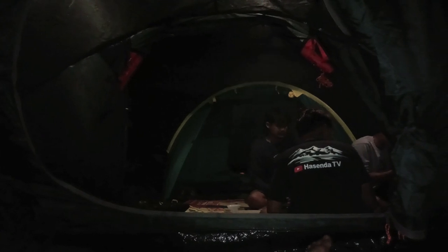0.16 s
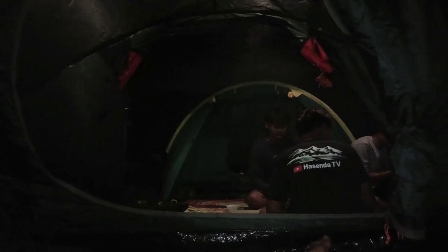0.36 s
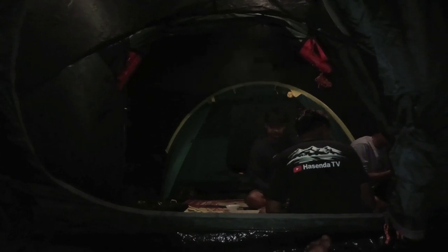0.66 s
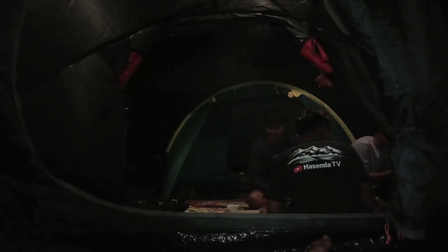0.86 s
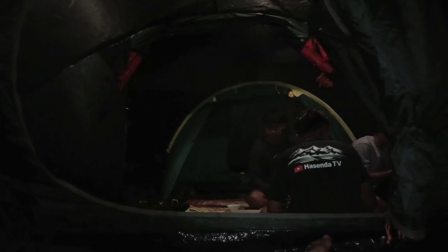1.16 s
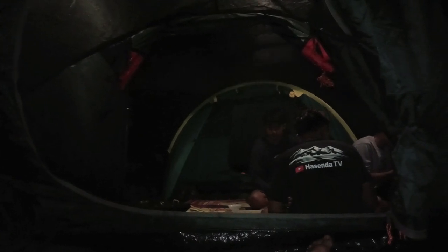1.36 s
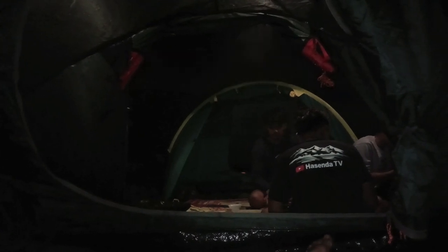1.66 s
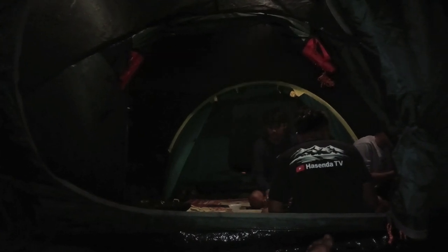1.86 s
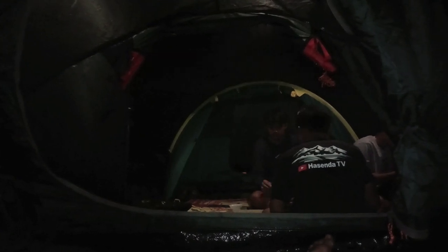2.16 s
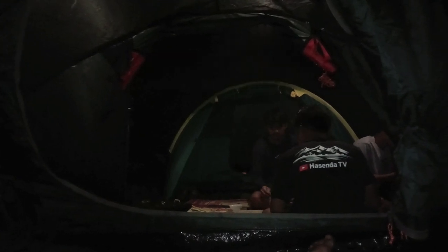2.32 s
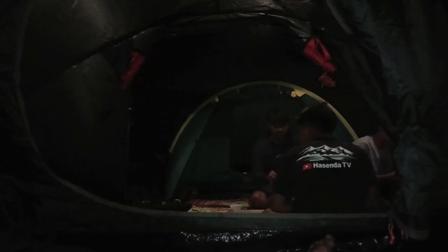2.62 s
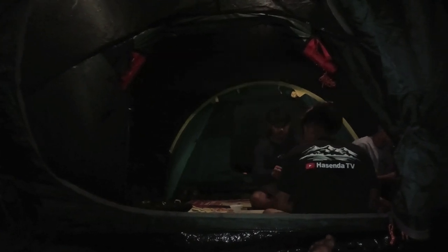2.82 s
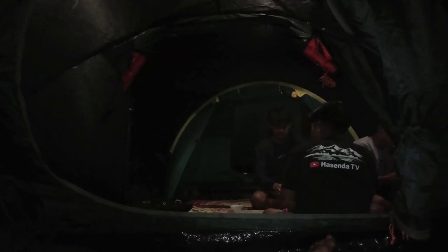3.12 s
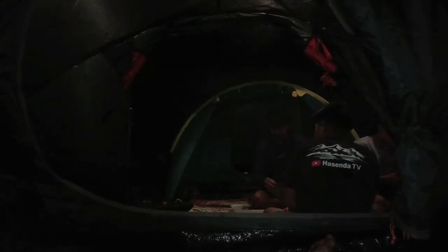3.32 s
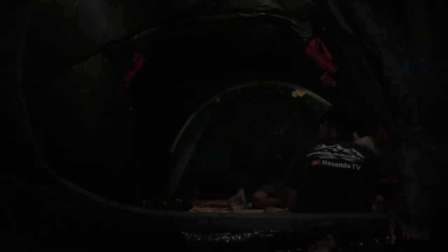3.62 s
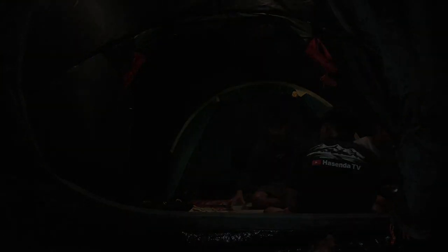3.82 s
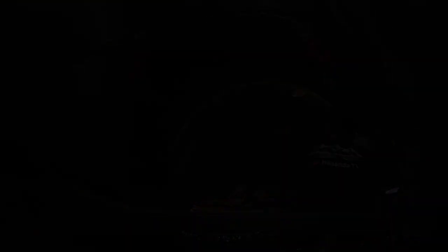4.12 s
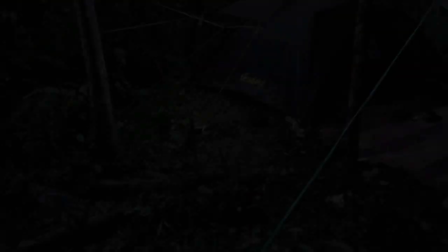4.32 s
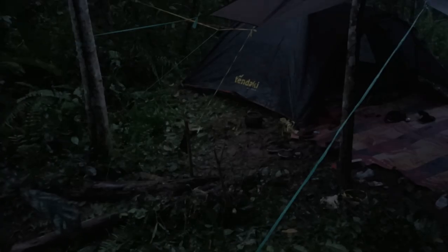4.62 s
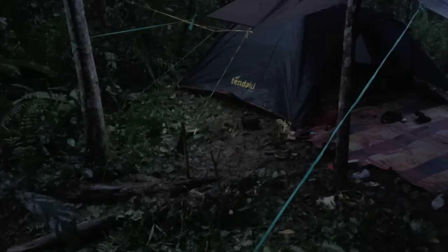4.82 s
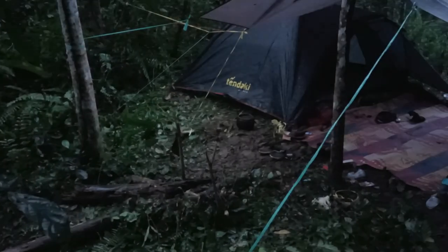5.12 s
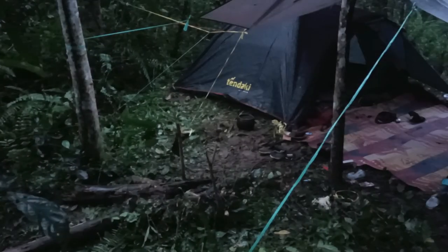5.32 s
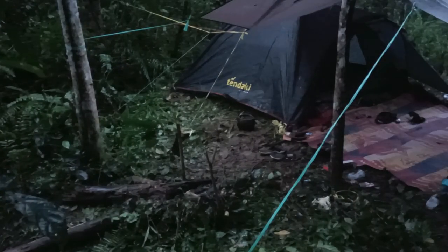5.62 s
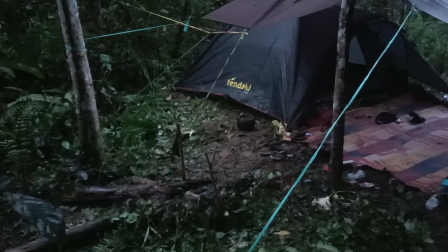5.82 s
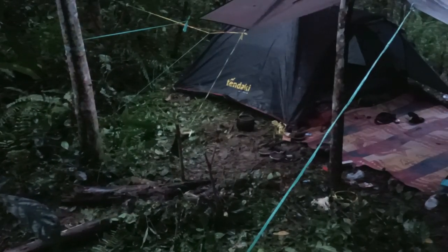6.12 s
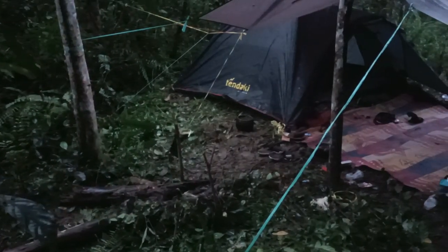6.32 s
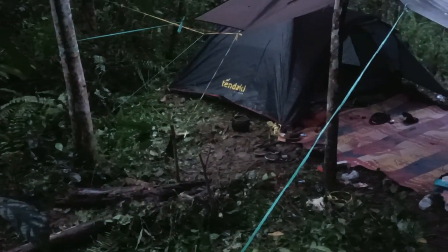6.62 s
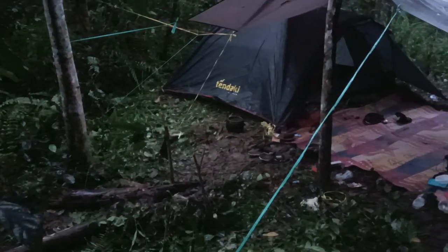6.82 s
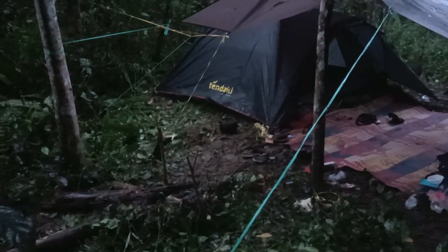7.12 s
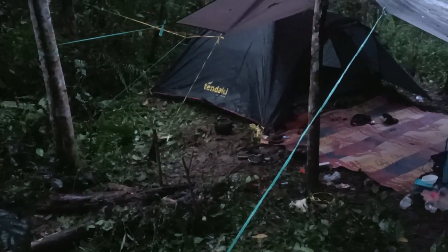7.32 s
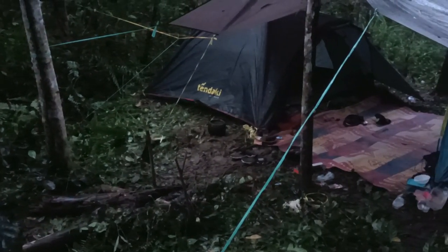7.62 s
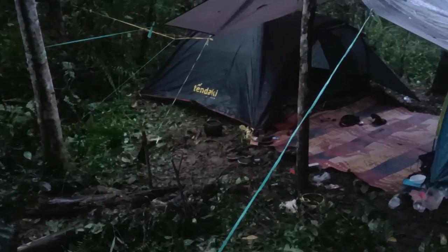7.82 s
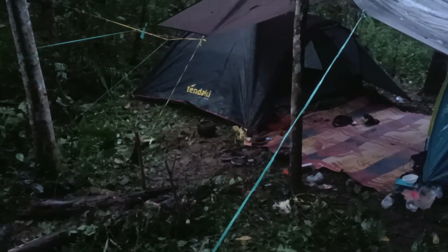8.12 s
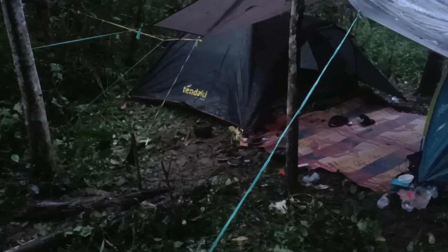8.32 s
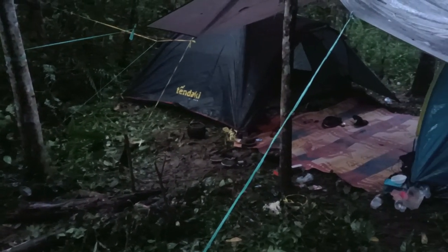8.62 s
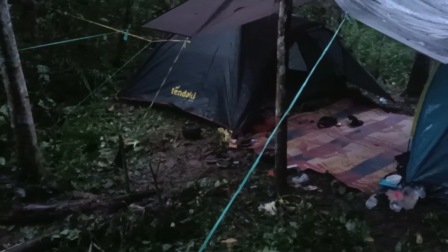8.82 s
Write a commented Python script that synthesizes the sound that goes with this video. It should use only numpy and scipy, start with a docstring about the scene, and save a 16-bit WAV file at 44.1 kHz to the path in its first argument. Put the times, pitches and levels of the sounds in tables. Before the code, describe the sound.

Heavy rain thumps and patters on a tarp overhead, fades out, then quiet forest dawn with rising bird whistles, chirps, insects and drips.

```python
"""Downpour on a tarp, then a forest at dawn

Fat drops thump the tarp just overhead: a push and scattered modes, a wet slap and noise spray, over a wash on leaves.
The rain fades away to a murmuring forest of shaped noise, where the last drips fall from the trees.
Birds whistle, sing and chirp as gliding tones among echoing trees; insects pip as tones and rasp as noise.
A cicada drones as a train of ringing clicks. The right microphone is the brighter one."""
import sys
import numpy as np
from scipy import signal
from scipy.fft import rfft, irfft, next_fast_len
from scipy.io import wavfile
from scipy.ndimage import map_coordinates

SR = 44100
rng = np.random.default_rng(int(sys.argv[2]) if len(sys.argv) > 2 else 0)


def generate_wav(sig):
    """Save sig (samples, or channels by samples) to the path in sys.argv[1] as 16-bit PCM at SR."""
    pcm = np.round(np.clip(np.atleast_2d(sig).T, -1, 1) * 32767).astype(np.int16)
    wavfile.write(sys.argv[1], SR, pcm)


N = 395136
CLOCK_S = np.arange(N) / SR
RAIN_ENDS_S, DAWN_S = 4.21, 4.275

# the forest's murmur through the morning, before each layer's trim: start_s, murmur_db
MORNING = [(4.32, -68.5), (4.51, -63), (4.89, -60), (5.67, -67.5), (8.66, -68), (8.9, -67.5)]


def amp(db):
    """Decibels to gain."""
    return 10 ** (np.asarray(db) / 20)


def unit(x):
    """Scale a sound to rms 1."""
    return x / np.sqrt(np.mean(x ** 2) + 1e-20)


def along(points, hz):
    """Read a curve of (Hz, value) points on a log frequency axis."""
    point_hz, values = np.transpose(points)
    return np.interp(np.log(hz + 1), np.log(point_hz + 1), values)


def curves(rows):
    """One value per sample for each column after the time."""
    s, *columns = np.transpose(rows)
    return [np.interp(CLOCK_S, s, column) for column in columns]


def wobble(rate, size=N):
    """A smooth random curve with this many knots a second."""
    knots = rng.standard_normal(int(size * rate / SR) + 4)
    return map_coordinates(knots, [np.arange(size) * rate / SR])


def filtered(x, response):
    """Multiply the spectrum of a sound by a response of frequency."""
    size = next_fast_len(N + SR // 2)
    spectrum = rfft(x, size) * response(np.fft.rfftfreq(size, 1 / SR))
    return irfft(spectrum, size)[..., :N]


def coloured(x, spectrum, size=2048):
    """Causal (minimum-phase) filter that keeps the power of white noise."""
    gain = amp(along(spectrum, np.fft.rfftfreq(size, 1 / SR)))
    cepstrum = irfft(np.log(gain))
    fold = np.r_[1, np.full(size // 2 - 1, 2), np.zeros(size // 2)]
    kernel = irfft(np.exp(rfft(cepstrum * fold)))
    return signal.fftconvolve(x, kernel[None] / np.linalg.norm(kernel), axes=1)[:, :N]


def add(track, s, sound):
    """Mix a sound into a track at time s."""
    part = track[..., max(round(s * SR), 0):][..., :sound.shape[-1]]
    part += sound[..., :part.shape[-1]]


def rush(spectrum, grain_db):
    """Stereo noise of rms 1, near mono in the bass, with a fine flutter of level."""
    # likeness of left and right: pitch_hz, correlation
    likeness = [(60, 0.89), (280, 0.76), (640, 0.07), (1400, -0.23), (3000, -0.058)]

    def mid_side(hz):
        turn = np.arccos(np.clip(along(likeness, hz), -1, 1)) / 2
        return amp(along(spectrum, hz)) * [np.cos(turn), np.sin(turn)]
    pair = rng.standard_normal((2, N)) * amp(grain_db * wobble(300))
    mid, side = filtered(pair, mid_side)
    return unit(np.array([mid + side, mid - side]))


def trees(x, direct_db, early_t60, late_t60, late_db, trunks_db=4.5):
    """Near trunks scatter a sound in uneven bunches, the deeper forest adds a second decay; t60 in s."""
    t = np.arange(SR) / SR
    decay = amp(-60 * t / early_t60) + amp(late_db - 60 * t / late_t60)
    decay = decay * (1 - np.exp(-t / 0.0033))
    echo = rng.standard_normal((2, SR)) * decay * amp(trunks_db * wobble(111.3, SR))
    echo = echo / np.linalg.norm(echo, axis=1, keepdims=True)
    wet = signal.fftconvolve(x[None], echo, axes=1)[:, :N]
    return (amp(direct_db) * x + wet) / np.hypot(1, amp(direct_db))


def forest():
    """Noise murmurs over a low rumble; far insects are a narrow random band that comes and goes."""
    # spectrum of the murmur: pitch_hz, level_db per Hz
    air = [(25, -14), (130, -7), (250, -8), (420, -4), (950, -9.5), (1500, -7.5), (2300, -6.5), (4200, -14),
           (6200, -10.5), (7000, -12), (8200, -27), (9600, -13.5), (11500, -33), (13000, -21.5),
           (15500, -25)]
    # spectrum of the rumble under it: pitch_hz, level_db per Hz
    low_rumble = [(15, -14), (30, -11.5), (80, -1), (150, -1), (230, -10.5), (500, -27.5)]
    murmur_db, = curves(MORNING)
    murmur = amp(murmur_db + 9) * rush(air, grain_db=1.6)
    rumble = amp(-63.5) * rush(low_rumble, grain_db=1.0)
    drift = wobble(110) + 1j * wobble(110)
    far_pips = np.real(drift * np.exp(2j * np.pi * 5030 * CLOCK_S))
    far_pips = far_pips * amp(-73.5 + 1.9 * wobble(11))
    return murmur + rumble + far_pips


def cicada(ring_s=0.0013, weak_click=0.57, jitter=0.00126, flutter_db=1.0):
    """The tymbal buckles in and out, a strong and a weak click; each rings the body, and the trees blur them."""
    # the drone: start_s, body_hz, level_db
    drone = [(4.3, 6830, -59.5), (5.3, 6900, -61), (6.3, 6850, -66.5), (7.3, 6850, -67.5),
             (8.1, 6540, -63.5), (8.96, 6230, -61.5)]
    clicks_hz, tires_at_s, slows_hz_per_s = 258.5, 7.3, 2.4
    body_hz, db = curves(drone)
    rate = clicks_hz - slows_hz_per_s * np.maximum(CLOCK_S - tires_at_s, 0)
    unsteady = jitter * (1 + np.abs(rate - rate.max()))  # the beat loosens as the song winds down
    clicks = np.cumsum(rate * (1 + unsteady * wobble(60))) / SR
    age = clicks % 1 / rate  # seconds since the last click
    size = np.where(np.floor(clicks) % 2, weak_click, 1) * amp(flutter_db * wobble(25))
    envelope = np.exp(-age / ring_s) * (1 - np.exp(-age / 0.00051))
    ring = size * envelope * np.sin(2 * np.pi * body_hz * age)
    return trees(amp(db) * unit(ring), direct_db=0.5, early_t60=0.32, late_t60=1.0, late_db=-11.5)


def tone(s, pitch, db, attack=0.0061, release=0.0058, waver=0.0046, flutter_db=1.5, overtone_db=-26):
    """A track with one nearly pure note along a pitch curve; its overtones flash near 10 kHz."""
    size, track = len(pitch), np.zeros(N)
    t = np.arange(size) / SR
    phase = 2 * np.pi * np.cumsum(pitch * (1 + waver * wobble(118, size))) / SR
    gate = np.clip(np.minimum(t / attack, (t[-1] - t) / release), 0, 1)
    gate = gate * amp(flutter_db * wobble(29.5, size))
    overtones = sum(np.sin(k * phase) * np.exp(-((k * pitch - 9850) / 750) ** 2) for k in (3, 4))
    richness = amp(overtone_db + np.minimum(db + 36, 0))  # softer notes are purer
    add(track, s, np.sqrt(2) * amp(db) * gate * (np.sin(phase) + richness * overtones))
    return track


def progress(length):
    """From 0 to 1 over a note's length in seconds."""
    return np.linspace(0, 1, int(length * SR))


def pip(s, length, hz, db, rise=.16, fall=0.32):
    """A thin, fluttering note that swells and fades over shares of its length."""
    pitch = np.full(int(length * SR), hz)
    return tone(s, pitch, db, attack=rise * length, release=fall * length,
                waver=0.0034, flutter_db=1.0, overtone_db=-60)


def insects():
    """Thin tonal pips, and katydid rasps made of very high noise strokes, both echoed by the trees."""
    # pips: start_s, length_s, pitch_hz, level_db before the trees
    pip_rows = [(4.276, .09, 5330, -64), (4.70, 0.16, 5020, -53), (5.154, 0.071, 5000, -42.5),
                (5.605, 0.072, 4975, -45), (5.999, .12, 5300, -50), (6.126, .05, 5010, -50),
                (6.598, 0.057, 4980, -42.5), (6.78, 0.11, 5040, -59), (7.102, .1, 5285, -50),
                (7.579, .064, 5060, -58), (8.255, 0.028, 5060, -50), (8.59, 0.062, 4990, -42)]
    # rasps: start_s, length_s, level_db before the trees
    rasp_rows = [(4.267, .12, -61), (5.26, .073, -66.5), (5.64, .07, -59), (6.102, 0.064, -42),
                 (8.237, 0.072, -43.5), (8.708, .047, -61.5)]
    # spectrum of a rasp: pitch_hz, level_db per Hz
    rasp_spectrum = [(9000, -54.5), (12300, -28), (13500, -11), (14700, -12.5), (15200, 6.5), (15600, -9.5)]
    pips = sum(pip(*row) for row in pip_rows)
    rasps = np.zeros(N)
    for s, length, db in rasp_rows:
        stroke = signal.windows.tukey(int(length * SR), .6)
        add(rasps, s, amp(db) * stroke * rng.standard_normal(len(stroke)))
    rasps = coloured(rasps[None], rasp_spectrum)[0]
    pips = trees(pips, direct_db=-3.5, early_t60=0.27, late_t60=.8, late_db=-8)
    rasps = trees(rasps, direct_db=5.0, early_t60=.2, late_t60=.6, late_db=-10)
    return pips * amp([[-3], [-1.5]]) + rasps * amp([[-5], [0]])  # left, right


def whistle(s, length, first_hz, last_hz, db, scoop_hz=230, scoop_s=.075, swell_db=1.5):
    """The pitch scoops up into a long, even rise, and the note swells as it climbs."""
    u = progress(length)
    rise = last_hz + (first_hz + scoop_hz - last_hz) * (1 - u)
    pitch = rise - scoop_hz * np.exp(-u * length / scoop_s)
    return tone(s, pitch, db + swell_db * (u - .5), attack=0.019, release=0.011,
                waver=0.0078, flutter_db=1.0, overtone_db=-22.5)


def song(s, first_hz, top_hz, sweep_db, soft_db):
    """A soft note arches over, then an upsweep starts flat, steepens and levels off at its top."""
    soft_s, soft_hz, arch_hz = .2, 3010, 259.7
    sweep_s, sweep_curve = .26, 2.1
    arch = soft_hz + arch_hz * np.sin(2.56 * progress(soft_s))
    climb = np.minimum(progress(sweep_s) / .88, 1) ** sweep_curve
    sweep = first_hz + (top_hz - first_hz) * climb
    soft_note = tone(s - soft_s - .02, arch, soft_db, attack=0.039, release=0.068)
    return soft_note + tone(s, sweep, sweep_db, attack=.03, release=0.056, overtone_db=-34)


def chirp(s, length, first_hz, held_hz, slide_s, db, swell_db=7):
    """The pitch slides quickly onto a held note, and the level swells as it settles."""
    away = np.exp(-progress(length) * length / slide_s)
    pitch = held_hz + (first_hz - held_hz) * away
    return tone(s, pitch, db - swell_db * np.sqrt(away), attack=0.012, release=0.0094, overtone_db=-23.5)


def birds():
    """Birds call from the trees, a little to the right; the far ones are mostly echo."""
    # long rising whistles: start_s, length_s, first_hz, last_hz, level_db before swell and trees
    whistles = [(4.97, .23, 2250, 3005, -57.5), (5.313, .40, 1780, 2858, -35),
                (7.319, .19, 2200, 2500, -63), (7.465, .40, 1768, 2900, -33.5)]
    # two-note songs: upsweep_start_s, first_hz, top_hz, upsweep_db, soft_note_db before the trees
    songs = [(4.42, 3057, 3930, -40.5, -49), (5.81, 2955, 3570, -49.5, -52.5),
             (7.759, 3110, 3930, -41, -44)]
    # chirps: start_s, length_s, first_hz, held_hz, slide_s, level_db once settled, before the trees
    chirp_rows = [(4.684, 0.086, 1885, 2845, .035, -38.5), (6.372, 0.064, 1990, 2787, 0.0138, -37.5),
                  (6.869, 0.1041, 3960, 2912, .025, -32)]
    near_db = -45  # whistles above this level come from a near perch
    near = sum(trees(whistle(*row), direct_db=-3.5, early_t60=0.46, late_t60=0.69, late_db=-11.5)
               for row in whistles if row[-1] > near_db)
    chirps = sum(chirp(*row) for row in chirp_rows)
    chirps = trees(chirps, direct_db=-5.5, early_t60=0.44, late_t60=0.59, late_db=-13.5)
    far = sum(whistle(*row) for row in whistles if row[-1] <= near_db)
    far = far + sum(song(*row) for row in songs)
    far = trees(far, direct_db=-9, early_t60=0.71, late_t60=0.62, late_db=-7)
    return (near + chirps + far) * amp([[-.9], [.3]])  # left, right


def thump(t, hz, push_t60=0.017, ring_t60=0.057, ring_db=-13, spread=.5, apart=0.48, count=12):
    """A drop dents the fabric in one push; the patch around it rings briefly in scattered modes."""
    push = np.sin(2 * np.pi * hz * t) * amp(-60 * t / push_t60)
    modes_hz = np.sqrt(hz * 350) * np.exp(spread * rng.standard_normal((count, 1)))
    modes = np.sin(2 * np.pi * (modes_hz * t + rng.random((count, 1))))
    weights = rng.standard_normal(count) + apart * rng.standard_normal((2, count))  # shared + per side
    ring = unit(weights @ modes) * amp(-60 * t / ring_t60)
    return unit(push + amp(ring_db) * ring * (1 - np.exp(-t / 0.00084)))


def splash(t, crack_t60, tail_t60, tail_db, clump_db=8.0):
    """The drop bursts with a crack, then its droplets scatter in clumps."""
    droplets = amp(tail_db - 60 * t / tail_t60 + clump_db * wobble(500, len(t)))
    return unit(rng.standard_normal((2, len(t))) * (amp(-60 * t / crack_t60) + droplets))


def tock(t, centre_hz=1500, spread=0.27, t60=0.028, count=4):
    """Each spot of taut fabric answers with a few short, higher modes of its own."""
    hz = centre_hz * np.exp(spread * rng.standard_normal((count, 1)))
    weights = rng.standard_normal((2, count))
    return unit(weights @ np.sin(2 * np.pi * hz * t) * amp(-60 * t / t60))


def impacts(rows, thump_db, slap_db, spray_db, tock_db=-5.5, sharpen=0.46, size=3000):
    """Drops (start_s, pitch_hz, thump_db, spray_db), each a thump, a wet slap with its tock and a bright spray."""
    # how the stretched tarp radiates: pitch_hz, gain_db
    tarp = [(20, -30), (50, -15), (100, -7), (185, 0.5), (310, -3.5), (500, 2), (720, -2), (1100, 6),
            (3000, -2.5)]
    # spectrum of the wet slap: pitch_hz, level_db per Hz
    slap_spectrum = [(300, -17.5), (700, -4), (1050, -6), (1400, 2.5), (1900, -6.5), (2500, -5),
                     (3300, -15.5), (5000, -43)]
    # spectrum of the spray: pitch_hz, level_db per Hz
    spray_spectrum = [(1500, -26), (3200, -5), (4500, -0.5), (6300, 0.5), (8000, -14), (9800, -8.5),
                      (11500, -18.5), (13000, -14), (16000, -29.5)]
    slap_follows_spray = 0.38  # share of the way from the thump's level to the spray's
    thumps, slaps, sprays, tocks = np.zeros((4, 2, N))
    t = np.arange(size) / SR
    for s, hz, low_db, high_db in rows:
        mid_db = low_db + slap_follows_spray * (high_db - low_db) + slap_db
        crack_db = sharpen * max(high_db + 44.5, 0)  # a hard drop spends more of its sound in the first crack
        slap = splash(t, crack_t60=0.0076, tail_t60=0.059, tail_db=-2.0 - crack_db, clump_db=1.5)
        spray = splash(t, crack_t60=0.002, tail_t60=0.099, tail_db=-3.5 - crack_db, clump_db=2.5)
        add(thumps, s + 0.00047, amp(low_db + thump_db) * thump(t, hz))
        add(slaps, s + .0008, amp(mid_db) * slap)
        add(sprays, s + .001, amp(high_db + spray_db) * spray)
        add(tocks, s + .0008, amp(mid_db + tock_db) * tock(t))
    thumps = filtered(thumps, lambda hz: amp(along(tarp, hz)))
    return thumps + coloured(slaps, slap_spectrum) + coloured(sprays, spray_spectrum) + tocks


def scattered(start, end, level_db, size_db, colour_db, pitch_hz, spread, count):
    """Rows of random drops between two times, their sizes scattered around a level curve."""
    chance = rng.standard_normal((count, 4))
    s = start + (np.arange(count) + 2 * rng.random(count)) * (end - start) / count
    level = np.interp(s * SR, np.arange(N), level_db)[:, None]
    level = level + size_db * np.minimum(chance[:, :1], 2)  # thump and spray together
    level = level + colour_db * np.minimum(chance[:, 1:3], 1)  # thump and spray apart
    return np.column_stack([s, pitch_hz * np.exp(spread * chance[:, 3]), level])


def dripping():
    """The wet trees drip: a few near drops, and faint ones that follow the level of the forest's murmur."""
    # the nearest drips: start_s, pitch_hz, thump_db, spray_db before trim
    near_drips = [(4.469, 810, -60.5, -64), (4.724, 390, -56, -63), (4.941, 510, -68, -52),
                  (5.385, 321.6, -64, -57), (5.888, 794, -62.5, -77), (6.147, 202, -70, -50.5),
                  (6.523, 338, -71, -57.5), (7.479, 824, -71, -56), (8.051, 785, -62, -68),
                  (8.54, 732, -65, -70), (8.839, 530, -88, -54.5)]
    murmur_db, = curves(MORNING)
    faint = scattered(DAWN_S, N / SR, murmur_db, size_db=2.5, colour_db=2.0,
                      pitch_hz=378, spread=0.51, count=44)
    near = impacts(near_drips, thump_db=-1.5, slap_db=0.0, spray_db=-3.0)
    return near + impacts(faint, thump_db=-5.5, slap_db=-9.5, spray_db=-5.5)


def downpour():
    """Hundreds of smaller drops on the tarp, and a noise wash of rain on the leaves around it."""
    # the rain's course: start_s, patter_db on the tarp, wash_db on the leaves, before trim
    rain = [(0.0, -41, -48), (0.35, -43.5, -50), (0.72, -41, -50), (1.84, -46.5, -50.5),
            (2.36, -44.5, -50.5), (3.24, -49.5, -56), (3.84, -58, -64.5), (4.13, -70.5, -76),
            (4.2, -76.5, -81.5)]
    # spectrum of the wash: pitch_hz, level_db per Hz
    leaves = [(18, -50.5), (30, -35), (164, -13), (532, -4.5), (656, -8.5), (921, -12.5), (1360, -5),
              (2360, -5.5), (3400, -13.5), (5740, -11), (7860, -22.5), (9680, -21.5), (11300, -28.5),
              (12600, -23.5), (15500, -43.5)]
    patter_db, wash_db = curves(rain)
    small = scattered(0, RAIN_ENDS_S, patter_db, size_db=3.0, colour_db=3.0,
                      pitch_hz=431, spread=0.414, count=600)
    patter = impacts(small, thump_db=-12.5, slap_db=-15.5, spray_db=-22)
    wash = amp(wash_db + 7.5) * rush(leaves, grain_db=2.0)
    return (patter + wash) * np.clip((RAIN_ENDS_S - CLOCK_S) / 0.03, 0, 1)


def fat_drops():
    """The big drops that land right overhead; the heaviest make the whole tarp heave in low modes."""
    # the fattest drops: start_s, fabric_pitch_hz, thump_db, spray_db before trim
    drops = [(.1267, 493, -41.5, -49.5), (0.1372, 470, -34, -48), (.192, 503, -35.5, -59),
             (0.2756, 566, -40.5, -47), (.4132, 493, -40.5, -49), (0.4397, 353, -34, -37.5),
             (0.5184, 357, -39, -46), (0.5433, 485, -37.5, -51), (0.5507, 434, -32.5, -37.5),
             (0.5734, 329, -34, -46), (0.596, 340, -35.5, -45), (.6095, 400, -41, -44.5),
             (.636, 380, -29, -33.5), (0.6649, 362, -33.5, -38.5), (0.7069, 264, -28.5, -36),
             (0.7226, 430, -36.5, -36.5), (0.7352, 410, -34, -37.5), (.803, 316, -29, -42),
             (.87, 407, -37.5, -45.5), (0.9306, 304, -42, -35.5), (0.9499, 398, -21.5, -27),
             (.9955, 535, -35, -44.5), (1.0541, 450, -39, -59), (1.1061, 453, -38.5, -52),
             (1.1245, 395, -34, -35), (1.1592, 433, -33, -39.5), (1.193, 456, -35.5, -38.5),
             (1.262, 373, -32.5, -41), (1.3305, 480, -38, -47), (1.4098, 447, -35.5, -43.5),
             (1.4913, 395, -22, -25.5), (1.5184, 427, -34, -44.5), (1.5873, 471, -34.5, -32.5),
             (1.6058, 380, -37.5, -52.5), (1.7012, 464, -39, -41.5), (1.8265, 540, -33.5, -43.5),
             (1.8812, 470, -42, -41), (1.9263, 540, -38.5, -38), (1.9595, 315, -34, -26),
             (2.0331, 480, -40.5, -55), (2.0932, 431, -35.5, -47), (2.2336, 403, -38.5, -41),
             (2.2476, 403, -39, -39), (2.3075, 362, -29, -36), (2.3869, 396, -28.5, -34),
             (2.4602, 380, -32.5, -33), (2.488, 346, -37.5, -34), (2.5346, 390, -38, -43),
             (2.6298, 520, -38, -48.5), (2.6989, 417, -33.5, -37), (2.8098, 380, -32, -39),
             (2.9, 390, -32, -34.5), (2.959, 306, -32.5, -42.5), (3.0548, 400, -40.5, -47.5),
             (3.0952, 333, -42, -48.5), (3.1103, 350, -41.5, -42), (3.2143, 390, -36.5, -40.5),
             (3.2748, 410, -43, -50.5), (3.3546, 455, -39, -52), (3.4953, 475, -44, -54.5),
             (3.6165, 310, -46.5, -55), (3.77, 297, -42.5, -49), (3.8377, 305, -44.5, -49.5),
             (3.9125, 390, -48, -54.5), (4.04, 433, -52, -72)]
    # modes of the whole tarp under a drop of heavy_db: pitch_hz, level_db, t60_s
    heave_modes = [(66, -40, .11), (118, -33.5, .09), (185, -38, .08)]
    heavy_db, heave_grows = -22, 2.2  # dB of thump; dB of heave per dB of thump
    heave, t = np.zeros(N), np.arange(SR // 4) / SR
    for s, _, db, _ in drops:
        swing = np.zeros(len(t))
        for hz, level, t60 in heave_modes:
            mode_hz = hz * np.exp(.08 * rng.standard_normal())
            swing += np.sin(2 * np.pi * mode_hz * t) * amp(level - 60 * t / t60)
        onset = 1 - np.exp(-t / 0.0022)
        add(heave, s + 0.0018, amp(heave_grows * (db - heavy_db)) * swing * onset)
    return heave + impacts(drops, thump_db=-7, slap_db=-7.0, spray_db=-9.0)


def scene():
    """Rain first, then the morning."""
    dawn = np.clip((CLOCK_S - DAWN_S) / 0.021, 0, 1)
    morning = forest() + cicada() + insects() + birds() + dripping()
    return dawn * morning + downpour() + fat_drops()


def record(dry, ceiling=0.39):
    """Each microphone port has its own colour; the hardest drops are rounded off, the top band is cut."""
    # right microphone over left: pitch_hz, ratio_db
    mic_tilt = [(600, 0), (1300, 0.5), (2400, 6.5), (3300, 5.5), (4400, 10), (5600, 16), (7000, 29),
                (8200, -1.5), (9000, -12.5), (10000, -32), (11200, -2.5), (12600, -1), (13600, 7.5),
                (15000, 19.5)]
    top_hz = 15800

    def ports(hz):
        ratio = amp(along(mic_tilt, hz))
        # the two ports' power adds up to the same at every pitch
        return np.sqrt(2 / (1 + ratio ** 2)) * np.array([np.ones_like(hz), ratio])
    heard = filtered(dry, ports)
    rounded = heard / (1 + (heard / ceiling) ** 4) ** (1 / 4)
    return filtered(rounded, lambda hz: hz < top_hz)


dry = scene()
out = record(dry)
generate_wav(out)
```